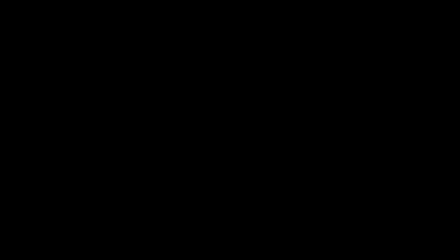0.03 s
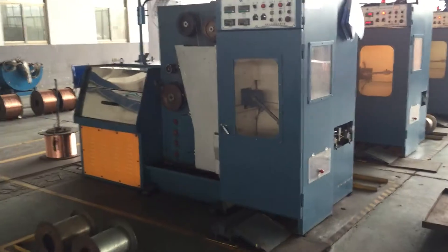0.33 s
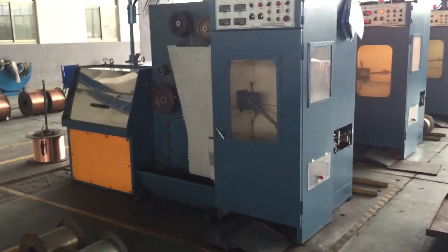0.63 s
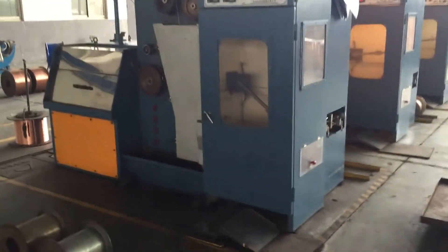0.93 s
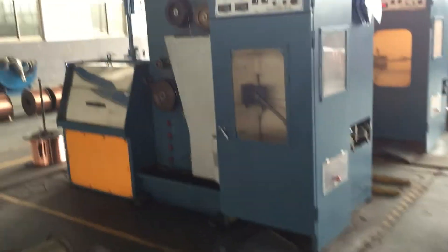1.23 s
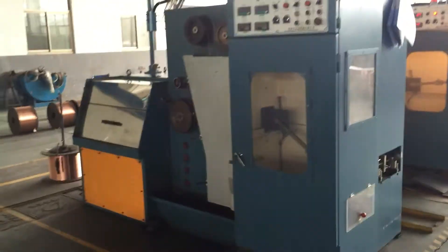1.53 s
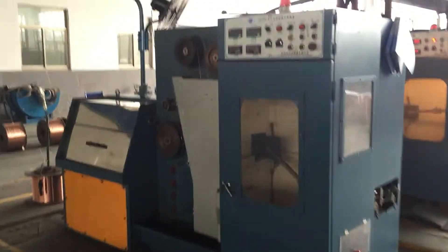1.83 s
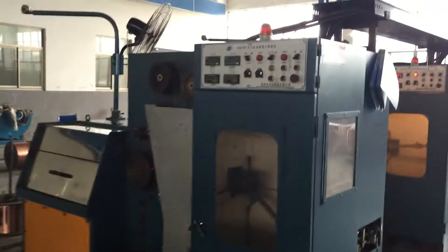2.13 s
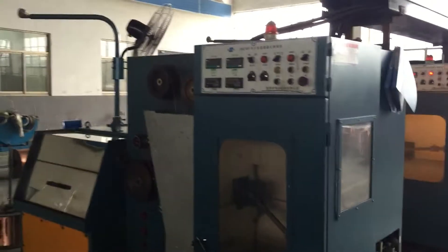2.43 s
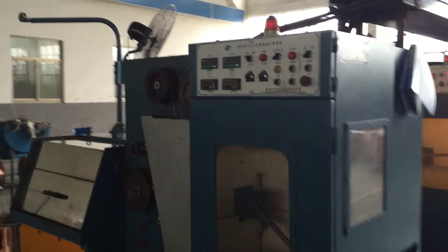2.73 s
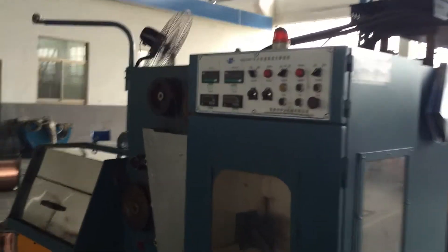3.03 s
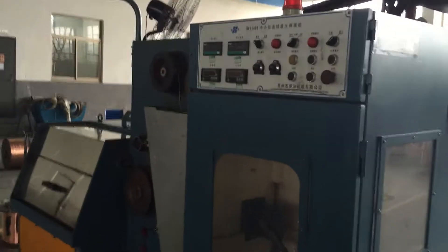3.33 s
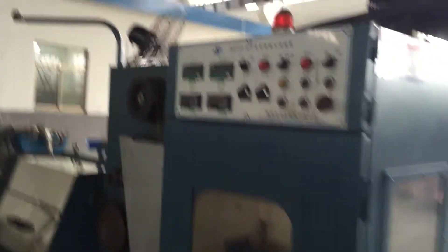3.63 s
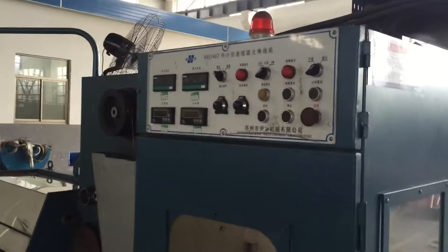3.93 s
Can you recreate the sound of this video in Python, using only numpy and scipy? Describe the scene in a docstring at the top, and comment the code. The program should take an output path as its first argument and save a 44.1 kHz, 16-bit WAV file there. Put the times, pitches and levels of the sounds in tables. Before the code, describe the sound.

A wire drawing machine runs steadily in a busy workshop, with humming motors, thin gear whine and bright hiss over a broad roar. As the microphone moves closer, the cabinet's drone grows and deep handling rumble builds.

```python
"""A wire drawing machine runs in a hard-walled workshop: wire and coolant hiss, the drives hum and
the gears add a thin whine, over the broad roar of the other machines. Every tone fades and returns
as the microphone is carried toward the cabinet, whose panel drone grows. Deep handling rumble
builds toward the end. The sound cuts in abruptly and drops out once, briefly."""
import sys
import numpy as np
from scipy import signal
from scipy.fft import rfft, irfft, next_fast_len
from scipy.io import wavfile
from scipy.ndimage import uniform_filter1d, map_coordinates

SR = 44100
rng = np.random.default_rng(int(sys.argv[2]) if len(sys.argv) > 2 else 0)


def store_wav(level_fs):
    """Save 16-bit WAV to argv[1]."""
    pcm = np.round(np.clip(np.atleast_2d(level_fs), -1, 1) * 32767)
    wavfile.write(sys.argv[1], SR, pcm.T.astype(np.int16))


N = 176400

# Colour of the handling rumble. Each row: frequency in Hz, relative level in dB.
RUMBLE_SPECTRUM = [(15, -30), (28, -15), (42, -4), (52, -1), (75, -7), (150, -31)]
# The rumble's build. Each row: time in seconds, level in dB.
RUMBLE_RIDE = [(0, -65), (1.4, -62), (2.4, -49), (3.5, -46), (3.75, -36), (4, -39)]
# Colour of the whole shop's roar. Each row: frequency in Hz, relative level in dB.
ROAR_SPECTRUM = [(20, -40), (32, -28), (42, -18), (54, -12), (70, -7), (110, -2.5), (170, 0), (280, -0.5),
                 (380, -2.5), (520, -4.5), (680, -3.5), (850, -4.5), (1000, -3), (1250, -3.5), (1650, -5),
                 (2080, -5), (2350, -10), (2570, -11), (2800, -9), (3080, -10), (3250, -14.5),
                 (4000, -16.5), (6000, -37)]
# Bands that swell in the roar. Each row: peak time in seconds, pitch in Hz, half-width in Hz, peak in dB.
ROAR_SWELLS = [(.35, 223, 70, -35), (1.08, 280, 14, -29.5), (1.35, 1245, 35, -31.5),
               (1.53, 1347, 31, -31.5), (2.2, 1230, 35, -34.5), (2.3, 1093, 41, -34),
               (2.55, 2910, 8.6, -36), (3.0, 208, 45, -33), (3.3, 245, 73, -30), (3.75, 1058, 30, -28)]
# Gentle level rides. Each row: time in seconds, roar trim in dB, hiss trim in dB.
ROAR_HISS_RIDES = [(.15, -0.5, 1.2), (1.2, -0.8, 1.4), (2.1, -0.34, 1.2), (3.0, -0.2, 1), (4, -0.5, -0.5)]
# The walk toward the cabinet. Each row: time in seconds, nearness from 0 (far) to 1 (close).
APPROACH = [(0, 0), (1.2, 0.5), (2.2, 0.45), (3.0, .45), (3.45, 0.9), (4, 0.97)]
# Resonances, likely of the cabinet's panels.
# Each row: pitch in Hz, half-width in Hz, level from afar in dB, change close by in dB.
PANEL_MODES = [(232, 66, -40.5, -1), (616, 49, -45.5, 12), (727, 37, -45.5, 16), (981, 49, -51.5, 8)]
# Hum of motors, shafts and belts. Each row: pitch in Hz, level in dB.
HUM_TONES = [(54, -49.5), (148, -41), (180, -43), (215, -39.5), (304, -42), (345, -42.5), (417, -40.5),
             (587, -44), (600, -40.5), (611, -36.5), (735, -40.5), (861, -43.5), (923, -44), (934, -37.5),
             (950, -39), (972, -43.5), (1001, -40.5), (1090, -44), (1141, -44.5), (1230, -43), (1322, -47),
             (1637, -50), (1795, -45.5), (1976, -48)]
# Whine of the gears. Each row: pitch in Hz, level in dB.
GEAR_TONES = [(2706, -45), (2764, -49), (2791, -45.5), (2955, -44.5), (3095, -53), (3927, -48.5),
              (4005, -46), (4081, -46)]
# Colour of the wire and coolant hiss. Each row: frequency in Hz, relative level in dB.
HISS_SPECTRUM = [(1500, -18), (3300, -3.5), (4000, 0), (4550, 3.5), (5000, -2), (5450, 2), (5900, 3),
                 (6700, -0.5), (7500, -2.5), (8300, 1), (8900, 0.5), (9900, -2.5), (10450, -6.5),
                 (11100, -2.5), (13000, -2.5), (15300, -4)]

ROAR_DB, HISS_DB = -21, -28.5
START_S, DROP_S, RETURN_S = 0.141, 0.892, 0.958
DROP_DB, LOW_FALL_DB_PER_S, TREBLE_FALL_DB_PER_S = -11.5, 800, 1700
CROSSOVER_HZ, TOP_HZ = 1060, 15380


def amp(db):
    return 10 ** (np.asarray(db) / 20)


def unit_rms(x):
    return x / np.sqrt(np.mean(np.abs(x) ** 2) + 1e-20)


def clock():
    return np.arange(N) / SR


def curves(rows):
    """One automation curve for each column after the time."""
    times, *columns = np.transpose(rows)
    return [np.interp(clock(), times, column) for column in columns]


def wobble(knots_per_s):
    """A smooth random modulator."""
    knots = rng.standard_normal(1024)
    return map_coordinates(knots, [clock() * knots_per_s], mode="wrap")


def filtered(x, response):
    """Equalise x with a gain given as a function of Hz."""
    size = next_fast_len(N + SR // 2)
    return irfft(rfft(x, size) * response(np.fft.rfftfreq(size, 1 / SR)), size)[..., :N]


def rush(spectrum, patchy_db):
    """Coloured noise of rms 1, mottled with patches of random gain in time and frequency."""
    cells = signal.stft(rng.standard_normal(N), nperseg=1024)[2]
    patches = uniform_filter1d(rng.standard_normal(cells.shape), size=4, axis=0)
    patches = unit_rms(uniform_filter1d(patches, size=12, axis=1))
    noise = signal.istft(cells * amp(patchy_db * patches), nperseg=1024)[1][:N]
    hz, db = np.transpose(spectrum)
    return unit_rms(filtered(noise, lambda f: amp(np.interp(np.log(f + 1), np.log(hz + 1), db))))


def resonance(hz, half_width_hz):
    """Noise of rms 1 ringing in one narrow band."""
    return unit_rms(filtered(rng.standard_normal(N), lambda f: 1 / (1 + 1j * (f - hz) / half_width_hz) ** 2))


def room_tones(table, diffuse, knots_per_s):
    """Steady tones, each a direct part plus reflections that shift as the listener moves."""
    mix = np.zeros(N)
    for hz, db in table:
        reflections = wobble(knots_per_s) + 1j * wobble(knots_per_s)
        path = unit_rms(1 + diffuse * reflections)
        tone = np.exp(2j * np.pi * (hz * clock() + rng.random()))
        mix += amp(db) * np.sqrt(2) * np.real(path * tone)
    return mix


def handling_rumble():
    """Deep microphone handling rumble builds toward the end."""
    level_db, = curves(RUMBLE_RIDE)
    return amp(level_db) * rush(RUMBLE_SPECTRUM, patchy_db=0)


def shop_roar():
    """The bed: all the machines blend into one roar with a slight flutter."""
    trim_db, _ = curves(ROAR_HISS_RIDES)
    return amp(ROAR_DB + trim_db + 0.22 * wobble(40)) * rush(ROAR_SPECTRUM, patchy_db=1.1)


def roar_swells(sigma_s=0.16):
    """Narrow bands lift out of the roar for a moment, each on a bell-shaped fade."""
    return sum(amp(db) * np.exp(-0.5 * ((clock() - peak_s) / sigma_s) ** 2) * resonance(hz, half_width)
               for peak_s, hz, half_width, db in ROAR_SWELLS)


def cabinet_drone():
    """The shaken panels drone, their upper resonances growing as the listener nears."""
    nearness, = curves(APPROACH)
    return sum(amp(far_db + close_db * nearness) * resonance(hz, half_width)
               for hz, half_width, far_db, close_db in PANEL_MODES)


def drives():
    """Turning shafts hum; the gears whine above them with a faster, deeper shimmer."""
    hum = room_tones(HUM_TONES, diffuse=0.75, knots_per_s=7.03)
    whine = room_tones(GEAR_TONES, diffuse=1.0, knots_per_s=14)
    return hum + whine


def wire_hiss():
    """Running wire and coolant give a bright, smooth hiss."""
    _, trim_db = curves(ROAR_HISS_RIDES)
    return amp(HISS_DB + trim_db + 0.2 * wobble(120)) * rush(HISS_SPECTRUM, patchy_db=0.86)


def scene():
    """The machine over the workshop bed, the same in both channels."""
    mono = handling_rumble() + shop_roar() + roar_swells() + cabinet_drone() + drives() + wire_hiss()
    return np.array([mono, mono])


def record(dry):
    """A hard cut in, one brief dropout with the treble dying first, and a steep high cut."""
    t = clock()
    in_dropout = (t > DROP_S) & (t < RETURN_S)

    def gate(fall_db_per_s):
        return (t > START_S) * amp(in_dropout * (DROP_DB - fall_db_per_s * (t - DROP_S)))

    lows = filtered(dry, lambda hz: 1 / (1 + (hz / CROSSOVER_HZ) ** 10))
    gated = lows * gate(LOW_FALL_DB_PER_S) + (dry - lows) * gate(TREBLE_FALL_DB_PER_S)
    return filtered(gated, lambda hz: np.clip((TOP_HZ - hz) / 150 + 0.5, 0, 1))


dry = scene()
out = record(dry)
store_wav(out)
```